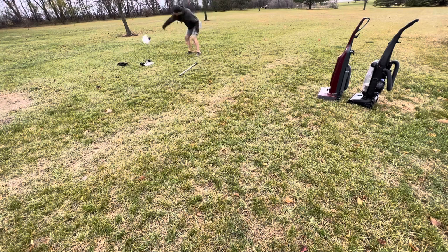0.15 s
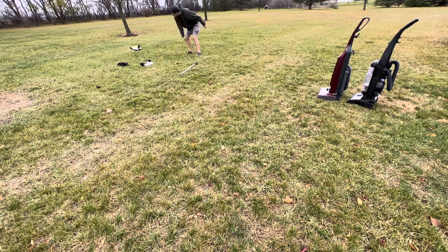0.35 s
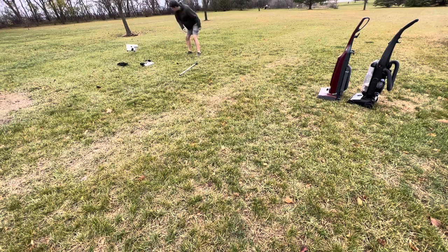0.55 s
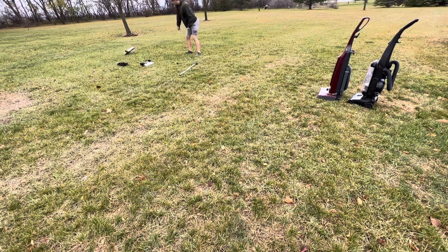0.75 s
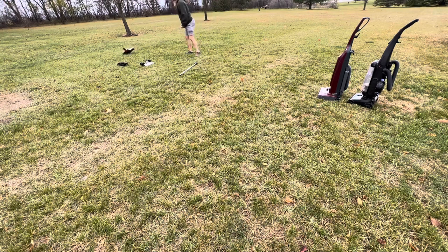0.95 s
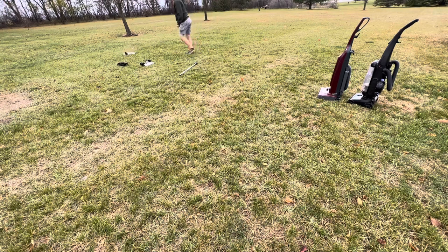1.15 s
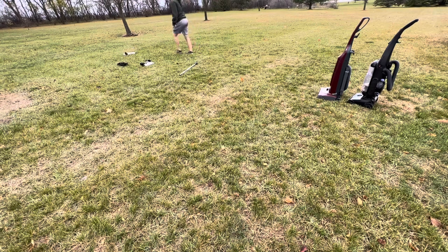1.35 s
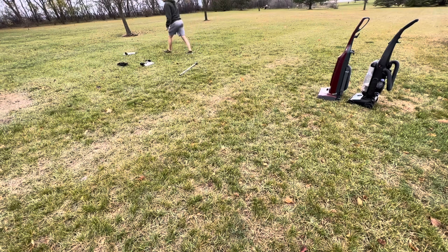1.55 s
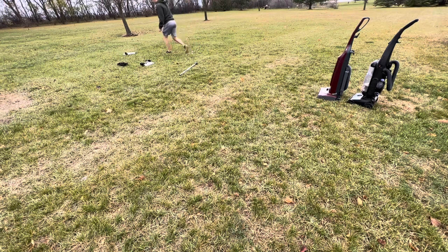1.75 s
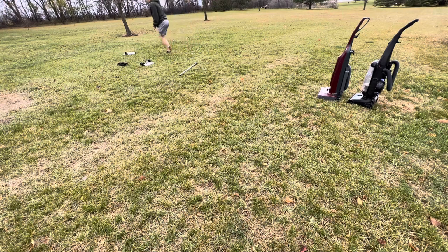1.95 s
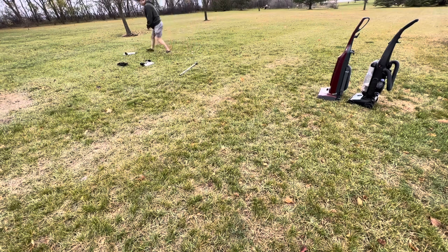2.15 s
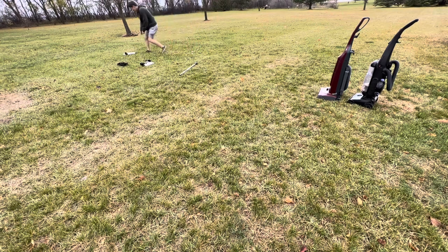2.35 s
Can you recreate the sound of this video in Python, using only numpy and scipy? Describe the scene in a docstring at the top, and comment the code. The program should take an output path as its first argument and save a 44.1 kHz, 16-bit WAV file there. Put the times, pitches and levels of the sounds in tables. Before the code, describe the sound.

Hollow plastic smashed with one sharp crack outdoors, shards clicking down in light wind.

```python
"""Plastic smashed on a lawn

Some metres left of the microphone, a heavy tool smashes a hollow plastic vacuum part on open grass.
The shell splinters in a quick run of cracks and knocks, the tree line answers, and shards drop and click.
Wind buffets the two microphone ports over faint steps, one far call and a soft outdoor wash."""
import sys
import numpy as np
from scipy import signal
from scipy.fft import rfft, irfft
from scipy.io import wavfile
from scipy.ndimage import uniform_filter1d

SR = 44100
rng = np.random.default_rng(int(sys.argv[2]) if len(sys.argv) > 2 else 0)


def persist_wave(psi):
    """Save psi, clipped to +-1, as 16-bit WAV."""
    counts = np.round(np.clip(psi, -1, 1) * 32767).astype(np.int16)
    wavfile.write(sys.argv[1], SR, np.atleast_2d(counts).T)


N = 105840


def smash(thud_hz=129.5, thud_db=-12.5, thud_t60=0.055, thud_rise_s=0.0081):
    """Some metres to the left the shell splits, the body knocks, and the turf takes the blow."""
    # splits of the shell (time [s], level [dB], t60 [s])
    cracks = [(0.2182, -27, 0.037), (0.222, -12.5, 0.038), (0.2241, -10.5, 0.012), (.2295, -8.5, 0.0068),
              (0.2331, -16, 0.027), (0.2338, -18.5, 0.019), (0.2444, -31, .03), (0.2528, -35, 0.088)]
    # colour of the cracking plastic (frequency [Hz], level [dB])
    crack_colour = [(300, -10.5), (600, -4.5), (1000, -0.5), (1400, -8), (1900, -10.5), (2500, -11.5),
                    (3600, -8.5), (6000, -10), (7100, -10.5), (8600, -12), (10500, -24), (12700, -14),
                    (13800, -36), (15000, -21.5), (16000, -24)]
    # blows into the hollow body (time [s], level [dB], contact time [s])
    knocks = [(.2250, -14.5, 0.00046), (0.2275, -12.5, 0.00076), (.2293, -13, .001),
              (0.2322, -11.5, 0.0012), (0.2353, -1.5, .0014), (0.2426, -18, 0.0013), (0.2585, -27, 0.0014),
              (0.311, -40, .0018)]
    out, t = np.zeros(N), np.arange(SR // 2) / SR
    for s, db, t60 in cracks:
        add(out, s, amp(db) * splinter(t60, causal(crack_colour)))
    for s, db, contact_s in knocks:
        add(out, s, amp(db) * knock(contact_s))
    thud_envelope = amp(thud_db - 60 * t / thud_t60) * np.minimum(t / thud_rise_s, 1)
    add(out, 0.2355, thud_envelope * np.sin(2 * np.pi * thud_hz * t))
    return out


def splinter(t60, colour, fractures_per_s=11000, spread_db=2, rise_s=0.0006, size=4096):
    """A dying burst of tiny fractures, coloured by the plastic."""
    t = np.arange(size) / SR
    ticks = rng.choice([-1., 1.], size) * amp(spread_db * rng.standard_normal(size))
    ticks *= rng.random(size) < fractures_per_s / SR
    envelope = np.minimum(t / rise_s, 1) * amp(-60 * t / t60)
    return signal.fftconvolve(unit(ticks) * envelope, colour)


def knock(contact_s, size=12288):
    """A short rounded push rings the modes of the hollow body."""
    # ring of the body (frequency [Hz], level [dB], t60 [s])
    body_modes = [(366, -13.5, 0.08), (463, -17.5, 0.082), (505, 0.5, 0.014), (590, -15.5, 0.067),
                  (629, -17.5, .08), (713, -29.5, .08), (929, -27, 0.1), (930, -26, 0.068),
                  (1220, -11, .045), (1554, -30, 0.036), (2050, -28, .05)]
    t = np.arange(size) / SR
    push = np.sin(np.pi * np.minimum(t / contact_s, 1)) ** 2
    return signal.fftconvolve(ring(body_modes, t), push / push.sum())[:size]


def shards(size=4096):
    """Loose pieces land nearer the microphone, each a ringing click over a duller hollow clack."""
    # landings and collisions (time [s], click level [dB], t60 [s], clack level [dB], tilt [dB/octave])
    landings = [(0.667, -40, 0.0069, -48, 4), (.6700, -29.5, .013, -28.5, 1.5),
                (0.707, -28.5, 0.013, -53, 2.5), (.7122, -38.5, 0.023, -43, 0.5),
                (.8080, -44, 0.033, -46.5, -4.5), (0.832, -54, 0.044, -57, -6),
                (1.1470, -31.5, 0.011, -54, 3), (1.1501, -40.5, 0.013, -37, -1)]
    # ring of a shard (frequency [Hz], level [dB], t60 [s])
    shard_modes = [(3034, -36, 0.017), (4105, -38.5, 0.031), (4560, -37, 0.044), (5870, -38, 0.019),
                   (8000, -35, 0.015)]
    # colours of the click and of the clack (frequency [Hz], level [dB])
    click_colour = [(300, -22), (1500, -4.5), (2500, -6), (3100, 8), (3700, 0.5), (4300, -0.5),
                    (5100, -5.5), (5900, -2.5), (7200, -2.5), (8400, -8), (11500, -10.5), (13500, -23),
                    (15500, -30)]
    clack_colour = [(150, -19), (400, -1), (900, 7.5), (1400, -0.5), (2000, 0.5), (2700, -7), (5000, -22),
                    (16000, -49)]
    out, t = np.zeros(N), np.arange(size) / SR
    ringing_tap = (t == 0) + ring(shard_modes, t)
    for s, click_db, t60, clack_db, tilt_db in landings:
        colour = signal.fftconvolve(causal(click_colour, tilt_db), ringing_tap)
        add(out, s, amp(click_db) * splinter(t60, colour / np.linalg.norm(colour)))
        add(out, s, amp(clack_db) * splinter(t60, causal(clack_colour)))
    return out


def outdoors(source, wet_db=0, paths=3, right_lag_s=0.0001957, turn_s=0.004):
    """Direct sound at the two ports; successive fractures take different paths over the lawn."""
    # balance between the ports (frequency [Hz], left minus right [dB])
    port_balance = [(100, 1.5), (380, 2.2), (700, 4.5), (1300, 3.5), (2400, 1), (4400, 2.5), (6000, 7.5),
                    (8300, -16.5), (11000, -1.5), (15000, -4)]
    half_db = read(port_balance, bins()) / 2
    right_delay = np.exp(-2j * np.pi * bins() * right_lag_s)
    out = filtered(source, np.array([amp(half_db), amp(-half_db) * right_delay]))
    turn = np.arange(N) / SR / turn_s
    for k in range(paths):
        crossfade = np.sin(np.pi / 2 * np.minimum((turn + k) % paths, 2))
        out += amp(wet_db) * signal.fftconvolve((source * crossfade)[None], lawn(), axes=1)[:, :N]
    return out


def lawn(near_t60=0.072, echo_s=0.147, echo_spread_s=0.006, far_db=-25.5, near_db=-9, echo_db=-36):
    """One response of the place: scatter from near turf and far field, and an echo off the tree line."""
    # decay of the far scatter (frequency [Hz], t60 [s])
    far_t60 = [(100, 0.71), (1000, 0.32), (4000, 0.99), (9000, 0.56), (11500, 0.5), (16000, .25)]
    # colours of the far field, the near turf and the tree line (frequency [Hz], level [dB])
    far_colour = [(100, -2), (400, 0), (800, -1.5), (1500, -1.5), (4000, -5.5), (8000, -3.5), (12000, -7.5),
                  (16000, -14.5)]
    near_colour = [(100, -10), (500, -9), (1200, 1.5), (5000, -3), (9000, -0.5), (16000, -6)]
    echo_colour = [(100, 3.5), (500, 7), (1000, -4), (3000, -0.5), (8000, -1), (16000, -19)]
    t = np.arange(SR) / SR
    far, near, echo = rng.standard_normal((3, 2, SR))
    hz, frame_s, spectra = signal.stft(far, SR, nperseg=256)
    spectra *= amp(-60 * frame_s / read(far_t60, hz)[:, None])
    far = signal.istft(spectra, SR, nperseg=256)[1][:, :SR]
    near *= amp(-60 * t / near_t60) * np.minimum(t / 0.002, 1)
    echo *= (t > echo_s) * np.exp(-abs(t - echo_s) / echo_spread_s)
    parts = (far_db, far, far_colour), (near_db, near, near_colour), (echo_db, echo, echo_colour)
    return sum(amp(db) * unit(signal.fftconvolve(part, causal(colour)[None], axes=1)[:, :SR])
               for db, part, colour in parts) / np.sqrt(SR)


def wind(rumble_db=1, lump_db=2, lump_s=0.036, buffet_octaves=0.87, lean_left_db=2):
    """Wind on the microphone: lumpy rumble, unrelated at each port, with sharper buffets on top."""
    # gusts (time [s], relative level [dB])
    gusts = [(0, -47), (.07, -36), (.17, -46), (.29, -48), (.35, -44), (0.419, -44), (.47, -46.5),
             (.57, -47), (.68, -35), (.8, -39), (0.871, -42.5), (.96, -37.5), (1.07, -39.5), (1.17, -47),
             (1.331, -44), (1.449, -46), (1.58, -40), (1.65, -37.5), (1.73, -41), (1.85, -38),
             (1.97, -40.5), (2.079, -42), (2.17, -54.5), (2.26, -46), (2.4, -42.5)]
    # colour of the rumble (frequency [Hz], level [dB])
    rumble_colour = [(20, -29), (38, -10), (60, 2.5), (100, -2.5), (160, -7), (250, -14.5), (400, -20.5),
                     (800, -43.5), (2000, -73)]
    # sharp buffets on the ports (time [s], relative level [dB], width [s], pitch [Hz])
    buffets = [(0.109, -41.5, 0.0084, 215), (.496, -36.5, 0.0058, 290), (0.537, -39, 0.017, 178),
               (.63, -41, 0.0093, 217), (0.661, -29.5, 0.0091, 247), (0.692, -28, .011, 109),
               (0.774, -39.5, 0.025, 190), (0.958, -30.5, 0.017, 178.3), (.995, -38, 0.0083, 150),
               (1.031, -37.5, 0.014, 180), (1.319, -34, 0.0039, 167.4), (1.372, -42, 0.008, 170.4),
               (1.511, -34.5, 0.003, 151), (1.81, -36, 0.013, 85), (1.885, -32.5, 0.0086, 175),
               (2.052, -45.5, 0.012, 220)]
    t = np.arange(N) / SR
    gust_db = np.interp(t, *np.transpose(gusts))
    rumble = unit(filtered(rng.standard_normal((2, N)), amp(read(rumble_colour, bins()))))
    lumps = unit(filtered(rng.standard_normal((2, N)), np.exp(-(bins() * lump_s) ** 2)))
    out = amp(gust_db + rumble_db) * unit(rumble * amp(lump_db * lumps))
    for s, db, width_s, hz in buffets:
        swell = np.exp(-.5 * ((t - s) / width_s) ** 2)
        band = np.exp(-(np.log2((bins() + 1) / hz) / buffet_octaves) ** 2)
        eddy = swell * filtered(rng.standard_normal((2, N)), band)
        out += amp(db) * unit(eddy) * np.sqrt(np.mean(swell ** 2))
    return out * amp([[lean_left_db], [-lean_left_db]])


def steps(blades_per_s=2200):
    """Each faint step crushes a cloud of dry grass blades."""
    # shoes brushing through the grass (time [s], level [dB], width [s])
    footfalls = [(0.059, -69, 0.015), (.76, -69, 0.079), (1.129, -65.5, .02), (1.208, -67.5, 0.022),
                 (1.38, -75, 0.1), (1.501, -73, 0.039), (1.84, -75, 0.022), (1.961, -69, 0.0076),
                 (2.03, -70, .04), (2.29, -76, 0.1)]
    # colour of dry grass (frequency [Hz], level [dB])
    grass_colour = [(1000, -14), (3000, -7.5), (5500, -1), (8800, 2), (10500, -14), (12500, -11),
                    (13700, -19), (15300, -11.5)]
    t = np.arange(N) / SR
    press = sum(amp(db) * np.exp(-.5 * ((t - s) / width_s) ** 2) for s, db, width_s in footfalls)
    blades = rng.standard_normal(N) * (rng.random(N) < blades_per_s / SR)
    return press * unit(signal.fftconvolve(blades, causal(grass_colour))[:N])


def far_call(blur_hz=28):
    """One faint falling tone, perhaps a bird, blurred by distance."""
    # course of the call (time [s], pitch [Hz], level [dB])
    call = [(2.28, 1528, -76), (2.31, 1494, -61), (2.335, 1446, -57), (2.355, 1416, -55), (2.4, 1345, -70)]
    s, hz, db = np.transpose(call)
    t = np.arange(N) / SR
    blur = unit(filtered(rng.standard_normal(N), np.exp(-(bins() / blur_hz) ** 2)))
    envelope = amp(np.interp(t, s, db)) * (t > s[0])
    phase = 2 * np.pi * np.cumsum(np.interp(t, s, hz)) / SR
    return envelope * blur * np.sin(phase)


def wash(level_db=-51, patch_db=2, size=1024):
    """Distant air and trees: soft noise with drifting patches."""
    # colour of the wash (frequency [Hz], level [dB])
    wash_colour = [(180, -30.5), (300, -7.5), (418, -12.5), (528, -2), (574, -7.5), (749, -5.5),
                   (1340, -14.5), (2840, -32.5), (8790, -39), (12500, -58.5), (13800, -61.5), (16000, -46)]
    # likeness of the two ports (frequency [Hz], correlation [-1 to 1])
    port_likeness = [(100, -0.32), (640, -0.53), (1400, -0.16), (3100, -0.058), (7000, 0.1), (15000, 0.056)]
    hz, hop = np.fft.rfftfreq(size, 1 / SR), size // 4
    left_re, left_im, apart_re, apart_im, patches = rng.standard_normal((N // hop + 5, len(hz), 5)).T
    patches = uniform_filter1d(patches, size=14, axis=0)  # smooth across frequency
    patches = unit(uniform_filter1d(patches, size=16, axis=1))  # and across time
    likeness = read(port_likeness, hz)[:, None]
    left = left_re + 1j * left_im
    right = likeness * left + np.sqrt(1 - likeness ** 2) * (apart_re + 1j * apart_im)
    spectra = np.array([left, right]) * amp(read(wash_colour, hz)[:, None] + patch_db * patches)
    return amp(level_db) * unit(signal.istft(spectra, nperseg=size, noverlap=size - hop)[1][:, :N])


def amp(db):
    """Decibels to gain."""
    return 10 ** (np.asarray(db) / 20)


def unit(x):
    """Scales to rms 1."""
    return x / np.sqrt(np.mean(x ** 2) + 1e-20)


def read(points, hz):
    """Reads a table on a log-frequency axis."""
    table_hz, value = np.transpose(points)
    return np.interp(np.log(hz + 1), np.log(table_hz + 1), value)


def add(mix, s, sound):
    """Adds a sound to the mix at s seconds."""
    part = mix[..., max(round(s * SR), 0):][..., :sound.shape[-1]]
    part += sound[..., :part.shape[-1]]


def bins():
    """Frequencies of a whole-length spectrum."""
    return np.fft.rfftfreq(N, 1 / SR)


def filtered(x, gain):
    """Applies a gain at each frequency of the whole-length spectrum."""
    return irfft(rfft(x) * gain, N)


def ring(modes, t):
    """Struck modes, each dying at its own rate."""
    return sum(amp(db - 60 * t / t60) * np.cos(2 * np.pi * hz * t) for hz, db, t60 in modes)


def causal(colour, tilt_db=0, size=2048):
    """Unit-energy minimum-phase response of a colour, tilted per octave above 1 kHz."""
    hz = abs(np.fft.fftfreq(size, 1 / SR))
    log_gain = np.log(amp(read(colour, hz) + tilt_db * np.log2(np.maximum(hz, 1000))))
    taps = np.fft.ifft(np.exp(np.conj(signal.hilbert(log_gain)))).real
    return taps / np.linalg.norm(taps)


def scene():
    """The lawn from the microphone; the shards land nearer, so they carry less of the field."""
    return outdoors(smash() + steps() + far_call()) + outdoors(shards(), wet_db=-2.5) + wind() + wash()


def record(dry, low_cut_hz=40, ceiling=0.92, top_hz=15950, half_taps=255):
    """The microphone's low cut, clipping at the ceiling, then the band limit."""
    low_cut = signal.butter(3, low_cut_hz, "high", fs=SR, output="sos")
    clipped = np.clip(signal.sosfilt(low_cut, dry), -ceiling, ceiling)
    padded = np.pad(clipped, ((0, 0), (half_taps, half_taps)), "reflect")
    band_limit = signal.firwin(2 * half_taps + 1, top_hz, window=("kaiser", 9), fs=SR)
    return signal.oaconvolve(padded, band_limit[None], "valid")


dry = scene()
out = record(dry)
persist_wave(out)
```